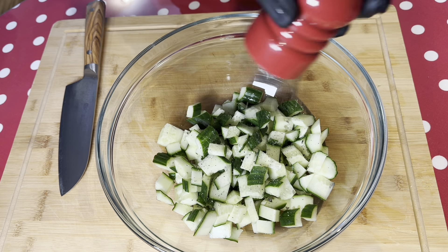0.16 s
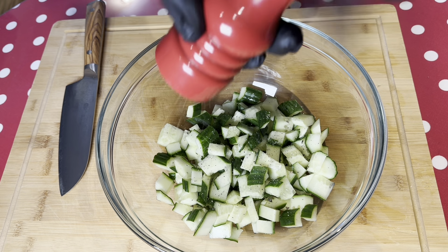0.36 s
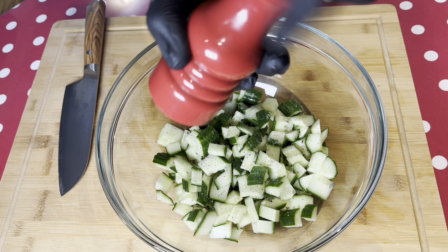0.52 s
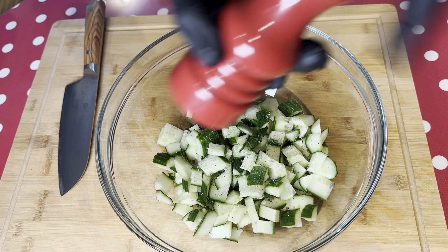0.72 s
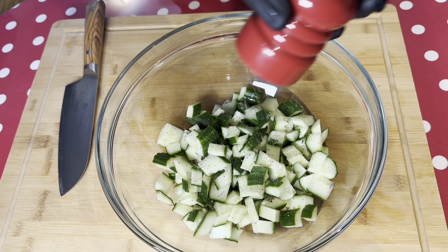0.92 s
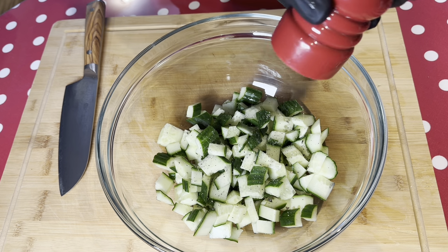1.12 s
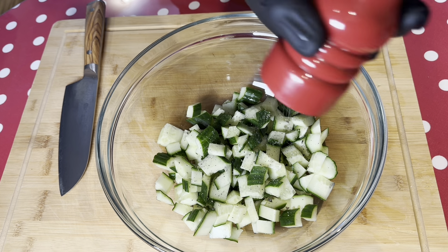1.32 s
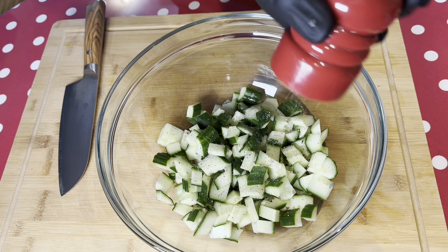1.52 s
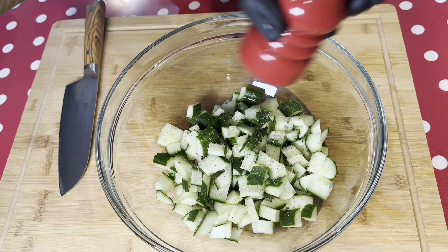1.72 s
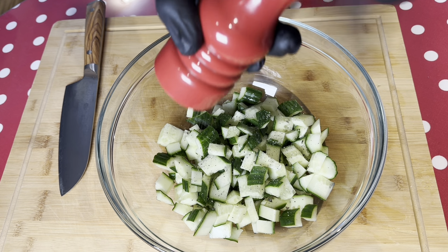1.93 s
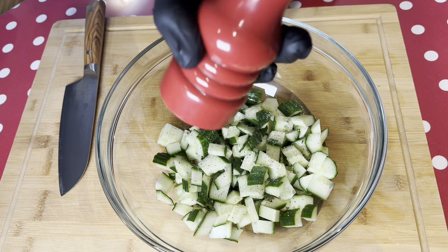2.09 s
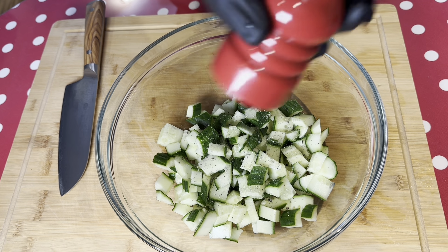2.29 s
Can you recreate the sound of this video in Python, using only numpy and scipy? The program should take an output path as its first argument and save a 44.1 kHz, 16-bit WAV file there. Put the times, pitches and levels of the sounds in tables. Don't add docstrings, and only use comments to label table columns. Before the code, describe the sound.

Close pepper grinding: quick, gritty twists with snapping corns and small ticks in a quiet kitchen.

```python
import sys
import numpy as np
from scipy import signal
from scipy.fft import rfft, irfft, next_fast_len
from scipy.io import wavfile
from scipy.ndimage import uniform_filter1d, map_coordinates

SR = 44100
rng = np.random.default_rng(int(sys.argv[2]) if len(sys.argv) > 2 else 0)


def undo_db(level):
    steps = np.asarray(level, float) / 20
    return 10 ** steps


def transcribe(signal):
    frames = np.atleast_2d(signal).T
    limited = np.clip(frames, -1, 1)
    pcm = np.round(limited * 32767).astype(np.int16)
    wavfile.write(sys.argv[1], SR, pcm)


N = 103635

# start t/s, swell t/s, hold t/s, level/dB
TWISTS = [
    (-.2, 0.094, 0.082, -35.5),
    (0.149, 0.053, 0.1, -45),
    (0.48, 0.056, 0.053, -40.5),
    (.787, 0.022, 0.084, -38.5),
    (1.098, 0.062, 0.041, -37.5),
    (1.399, 0.062, 0.053, -44),
    (1.681, 0.13, 0.023, -41.5),
    (2.023, 0.027, 0.07, -41.5),
    (2.276, 0.057, 0.039, -52),
]
# brightness level/dB, burr ring level/dB, body level/dB, left over right level/dB, trickle level/dB
TWIST_COLOURS = [
    (-6, 15.5, -13, 2.7, -50),
    (11.5, 8, 0.5, 1, -58),
    (5, 1, 0, 2.5, -55.5),
    (-5, -3, -0.5, 1.5, -58.5),
    (4, -1, -1.5, 0, -61.5),
    (4.5, 4, 3.5, -0.5, -54.5),
    (6, 0.5, 2, 1, -57.5),
    (8, 3.5, -3, 1.5, -58.5),
    (11, -11, 2.5, 0.5, -55),
]
# t/s, peak level/dB, thump level/dB, brightness level/dB, burr ring level/dB
CRACKS = [(0.163, -52, 1, 0.1, 3), (0.18, -36, -19, -12, 12), (0.249, -5.5, -22, -7, 3.8),
          (0.45, -37, -0.5, 11, -14), (0.504, -29, -2, 7, -26), (0.528, -11.5, -46, 1, 4),
          (0.576, -20, 1.5, -7, 6), (0.609, -32.5, -18, -4, 11.5), (0.774, -41, -6, 7, 3),
          (0.793, -24, -32, -14, -24), (0.888, -33, 2, 11.5, 6), (1.077, -33, -7.5, 9, 4.5),
          (1.115, -30.5, -10.5, 9.5, 2.5), (1.151, -21, -5, -15, -12), (1.28, -45, 8.5, -5, -5),
          (1.382, -28, -18.5, 0.1, -8), (1.416, -28.5, -9, 12.5, 5.5), (1.481, -30.5, 0.5, 4, 12),
          (1.513, -34, -25, 10, 15.5), (1.557, -39.5, 5.5, -14, -23), (1.688, -28, 2.5, 0, -14),
          (1.749, -44, -6, -12, -22), (2.015, -43, 11, 1, -11), (2.048, -12, -54, 8, 5)]
MORE_CRACKS = [
    (0.131, -39, -7, 12.5, -8),
    (1.612, -40, -17, 1, 3.5),
    (1.715, -29.5, -4, 0, -9),
    (1.891, -55, 4, -6, -6),
    (2.103, -32.5, 13.5, -11, -15),
    (2.277, -47.5, 3.5, 9, -4),
    (2.333, -23, -5, -11, -9),
]
# t/s, peak level/dB, pitch f/Hz, T60 t/s
CORN_NOTES = [(.162, -40, 4850, .015), (0.163, -42, 6100, .02), (.181, -38, 4190, 0.018),
              (2.046, -22, 1178, 0.022), (1.153, -26, 2670, 0.011), (0.248, -14, 3960, 0.035),
              (.249, -25, 1918, 0.046), (.258, -37.5, 200.3, 0.11), (0.525, -30, 5800, 0.013),
              (.575, -16, 1160, 0.019), (.579, -38.5, 295, 0.1), (.775, -42.5, 5000, 0.017),
              (1.151, -29, 1194, 0.029), (1.416, -34, 4970, 0.027), (1.558, -39.5, 1014, 0.022),
              (1.788, -38, 199.6, 0.12), (2.049, -20.5, 4210, 0.02), (2.105, -30, 1310, 0.011)]
# t/s, peak level/dB, pitch f/Hz, T60 t/s
TICKS = [(0.144, -38, 8200, 0.0086), (.2, -36, 4180, .02), (0.228, -33, 1500, .012),
         (.428, -47, 1100, .015), (.486, -46, 3800, 0.015), (.82, -27.5, 2170, 0.0078),
         (0.835, -39, 5300, 0.013), (0.854, -32, 2930, .015), (1.081, -44, 3150, 0.016),
         (1.154, -28.5, 4240, .012), (1.171, -26, 2480, 0.011), (1.207, -38, 1530, 0.01),
         (1.279, -55, 1155, .04), (1.375, -55, 6100, 0.0093), (1.559, -40.5, 1830, 0.013),
         (1.581, -49, 7700, 0.012), (1.69, -39, 1220, 0.0066), (1.697, -32, 3660, 0.011),
         (1.714, -43, 5200, .012), (1.731, -35, 2280, .01), (1.746, -36.5, 2750, 0.02),
         (1.808, -36, 4750, 0.014), (1.811, -33, 1590, 0.016), (1.832, -31, 2240, .01),
         (2.04, -31, 1520, 0.012), (2.048, -34, 5270, 0.013), (2.079, -25.5, 1030, 0.015),
         (2.113, -40, 605, 0.013), (2.301, -52, 3960, 0.013), (2.323, -30, 1160, 0.016),
         (2.342, -35, 480, .03)]
# t/s, peak level/dB, pitch f/Hz, T60 t/s
JOLTS = [
    (0.249, -45.5, 110, 0.17),
    (0.763, -56, 112, 0.12),
    (1.091, -63, 105, .15),
    (1.42, -68, 75, 0.13),
    (1.719, -51.5, 83, 0.21),
    (2.285, -59, 76, 0.28),
]
# start t/s, length t/s, pitch f/Hz, level/dB
RUBS = [(0.165, 0.13, 6100, -54), (0.177, 0.052, 4140, -53.5), (0.254, 0.047, 1790, -46),
        (0.818, 0.054, 5300, -54), (1.11, 0.11, 4115, -50), (1.457, 0.032, 4200, -47),
        (1.757, 0.082, 6140, -58), (1.758, 0.011, 2320, -49.5), (1.792, .04, 4220, -50),
        (2.055, 0.058, 4160, -55), (2.319, .06, 4170, -50)]
# f/Hz, width f/Hz, level/dB
BODY_MODES = [(212, 60.6, 8), (484, 156, -7), (1190, 16, 5), (1990, 153, -4), (2234, 36, -12),
              (2830, 280, -2.5)]
# f/Hz, width f/Hz, level/dB
BURR_MODES = [(4070, 71, 7), (4218, 142, 4), (4703, 286, 0), (5380, 150, -2), (6240, 260, -2),
              (8640, 650, -4.5)]
# f/Hz, level/dB
CRUNCH_SPECTRUM = [(60, -34), (200, -8), (500, -3), (2400, -3.5), (3350, -7.5), (5000, -7), (7300, -9.5),
                   (15000, -9)]
# f/Hz, level/dB
TRICKLE_SPECTRUM = [(150, -3), (600, -4), (3000, -0.5), (8000, -5.5), (14000, -1.5)]
# t/s, level/dB
GRIP = [(0, -81), (.29, -71), (.45, -81), (.58, -66), (.85, -102), (1.4, -81), (1.55, -78), (1.75, -72.5),
        (2.3, -79.5)]
# f/Hz, T60 t/s
KITCHEN_T60 = [(200, 0.3), (1000, 0.29), (4000, 0.35), (10000, 0.2)]
# f/Hz, level/dB
KITCHEN_SPECTRUM = [(200, -11), (600, -13), (1200, -9), (4000, -11), (7000, -4.5), (8500, -18)]
# f/Hz, level/dB
AIR_SPECTRUM = [(30, -38), (110, -17), (220, -13.5), (1000, -17), (4000, -17), (8500, -12.5),
                (14500, -11.5)]
# f/Hz, left over right level/dB
PORT_LEAN = [(100, 0.2), (500, -0.4), (2000, 0.5), (5000, 2.5), (7000, 1)]
# f/Hz, left lead/rad
PORT_TURN = [(300, 0.34), (700, 0.88), (1500, 0.66), (2500, 1), (4500, 0.77), (6900, -1.35)]

BITE_DB, RELEASE_DB_PER_S = -14.5, 509
TRICKLE_CLUMP_DB, TRICKLE_DB_PER_S, STILL_S = 7.5, 11, 0.029
GRIT_PER_S, GRIT_SAMPLES, GRIT_CYCLES = 3000, 160, 2.2
GRIT_HZ, GRIT_OCTAVES, GRIT_SPREAD_DB, GRIT_MOST = 4130, 1.492, 4, 1.7
CLUMP_DB, DUST_DB = 1.18, -4
CRACK_RISE_S, CRACK_T60_S, SOFTER_WHEN_SMALL = 0.0013, 0.083, 0.7
SNAP_DB, SNAP_S, AFTER_DB, AFTER_T60_S = 4.5, 0.0031, -10, 0.15
THUMP_LATE_S, THUMP_T60_S = 0.001534, 0.27
NOTE_RISE_CYCLES = 1.62
RUB_WIDTH_HZ, RUB_FLUTTER_DB, RUB_EDGE_S = 210, 4.5, 0.0036
ROOM_SHARED, AIR_DB = 0.1, -57.5
PORTS_IN_STEP_HZ, PORT_COMB_HZ, TOP_HZ, NOTCH_WIDER_RAD = 7900, 3150, 15330, 0.54


def unit(x):
    return x / np.sqrt(np.mean(x ** 2) + 1e-20)


def along(points, hz):
    f, v = np.transpose(points)
    return np.interp(np.log(hz + 1), np.log(f + 1), v)


def wobble(rate_hz):
    knots = rng.standard_normal(int(N * rate_hz / SR) + 4)
    return map_coordinates(knots, [np.arange(N) * rate_hz / SR])


def filtered(x, response):
    m = next_fast_len(N + SR // 2)
    return irfft(rfft(x, m) * response(np.fft.rfftfreq(m, 1 / SR)), m)[..., :N]


def resonances(modes):
    return lambda f: sum(undo_db(db) * 1j * f * w / (c * c - f * f + 1j * f * w) for c, w, db in modes)


def brighter(x):
    return filtered(x, lambda f: (1j * f / 5000 / (1 + 1j * f / 5000)) ** 2)


def mill():
    grains, on_burr, on_body, trickle, lean_db = grind()
    burst, push, treble, ring = cracks()
    thump = filtered(push, lambda f: 2.4 * np.exp(-2j * np.pi * f * THUMP_LATE_S) / (1 + 1j * f / 1300) ** 2)
    burst = filtered(burst, lambda f: 0.83 * (1j * f / 800 / (1 + 1j * f / 800)) ** 3)
    hollow = filtered(on_body, lambda f: 0.5 / (1 + 1j * f / 500) ** 2)
    direct = grains + hollow + burst + brighter(treble) + thump
    body = filtered(on_body + 1.42 * burst + thump, resonances(BODY_MODES))
    burr = filtered(on_burr + ring, resonances(BURR_MODES))
    crunch = filtered(direct + body + burr, lambda f: undo_db(along(CRUNCH_SPECTRUM, f) + 3.5))
    return crunch + trickle + notes() + rubs(), lean_db


def grind():
    t = np.arange(N) / SR
    power, fall, colour = np.zeros(N), np.zeros(N), np.zeros((4, N))
    next_starts = [twist[0] for twist in TWISTS[1:]] + [9]
    for (s, swell, hold, db), (*tone, trickle_db), next_s in zip(TWISTS, TWIST_COLOURS, next_starts):
        past = np.maximum(t - s - swell - hold, 0)
        bite_db = BITE_DB * np.clip(1 - (t - s) / swell, 0, 1)
        power += (t > s) * undo_db(db + bite_db - RELEASE_DB_PER_S * past) ** 2
        until_rest = np.clip((next_s - STILL_S - t) / 0.11, 0, 1)
        fall += (t > s) * undo_db(trickle_db - TRICKLE_DB_PER_S * past) * until_rest
        colour[:, t > s - STILL_S] = np.array(tone)[:, None]
    bright_db, burr_db, body_db, lean_db = colour
    clumps = undo_db(CLUMP_DB * (wobble(59.94) + wobble(150)))
    x = unit((grit() + undo_db(DUST_DB) * rng.standard_normal(N)) * clumps) * np.sqrt(power)
    trickle = unit(filtered(rng.standard_normal(N), lambda f: undo_db(along(TRICKLE_SPECTRUM, f))))
    trickle = trickle * undo_db(TRICKLE_CLUMP_DB * wobble(40.28)) * fall
    grains = x + (undo_db(bright_db) - 1) * brighter(x)
    return grains, x * undo_db(burr_db), x * undo_db(body_db), trickle, uniform_filter1d(lean_db, size=900)


def grit():
    count = round(GRIT_PER_S * N / SR)
    at, size, pitch = rng.random(count), rng.exponential(size=count), rng.standard_normal(count)
    hz = np.clip(GRIT_HZ * 2 ** (GRIT_OCTAVES * pitch), 300, 15000)[:, None]
    turns = hz * np.arange(GRIT_SAMPLES) / SR
    level = undo_db(GRIT_SPREAD_DB * np.minimum(size, GRIT_MOST))[:, None] * np.sqrt(hz)
    grains = level * np.sin(2 * np.pi * turns) * np.exp(-turns / GRIT_CYCLES * 2)
    where = (at * N).astype(int)[:, None] + np.arange(GRIT_SAMPLES)
    return unit(np.bincount(where.ravel(), grains.ravel(), N)[:N])


def cracks():
    out, t = np.zeros((4, N + SR)), np.arange(SR // 4) / SR
    for s, db, thump_db, bright_db, ring_db in CRACKS + MORE_CRACKS:
        rise = CRACK_RISE_S * undo_db(np.clip(SOFTER_WHEN_SMALL * (-22 - db), 0, 12))
        snap = undo_db(SNAP_DB) * np.exp(-(t / (SNAP_S + rise)) ** 4)
        crumble = undo_db(-60 * t / CRACK_T60_S) + undo_db(AFTER_DB - 60 * t / AFTER_T60_S)
        shape = (1 - np.exp(-(t / rise) ** 2)) * (snap + crumble)
        burst = undo_db(db - 15.5) * shape * rng.standard_normal(len(t))
        push = burst * undo_db(thump_db - 60 * t / THUMP_T60_S)
        parts = np.array([burst, push, burst * (undo_db(bright_db) - 1), burst * undo_db(ring_db)])
        out[:, round((s - rise) * SR):][:, :len(t)] += parts
    return out[:, :N]


def notes():
    out, t = np.zeros(N + SR), np.arange(SR // 4) / SR
    for s, db, hz, t60 in CORN_NOTES + TICKS + JOLTS:
        pair = np.sin(2 * np.pi * hz * t) + 0.31 * np.sin(2 * np.pi * (1.09 * hz * t + rng.random()))
        rise = 1 - np.exp(-t * hz / NOTE_RISE_CYCLES)
        out[round(s * SR):][:len(t)] += undo_db(db - 60 * t / t60) * rise * pair
    return out[:N]


def rubs():
    t, out = np.arange(N) / SR, np.zeros(N)
    for s, length, hz, db in RUBS:
        band = filtered(rng.standard_normal(N), lambda f: resonances([(hz, RUB_WIDTH_HZ, 0)])(f) ** 2)
        gate = np.clip(np.minimum(t - s, (s + length - t) / 2) / RUB_EDGE_S, 0, 1)
        out += undo_db(db + RUB_FLUTTER_DB * wobble(90)) * gate * unit(band)
    return out


def handling():
    s, db = np.transpose(GRIP)
    band = lambda f: (f / 52) ** 5 / (1 + (f / 52) ** 5) / (1 + (f / 110) ** 3)
    rumble = unit(filtered(rng.standard_normal(N), band))
    return rumble * undo_db(np.interp(np.arange(N) / SR, s, db) + 4.0 * wobble(9.53))


def kitchen(x):
    out = np.zeros((2, N + SR))
    edges = [0] + [round(twist[0] * SR) for twist in TWISTS[2:]] + [N]
    for a, b in zip(edges, edges[1:]):
        hz, t, z = signal.stft(rng.standard_normal((2, SR // 2)), SR, nperseg=256)
        decay = undo_db(-60 * t / along(KITCHEN_T60, hz)[:, None])
        tail = signal.istft(z * decay, SR, nperseg=256)[1]
        wet = signal.fftconvolve(x[None, a:b], tail / np.linalg.norm(tail[0]), axes=1)
        out[:, a + 200:][:, :wet.shape[1]] += wet
    shared = ROOM_SHARED * out[::-1] + out
    return filtered(shared[:, :N], lambda f: undo_db(along(KITCHEN_SPECTRUM, f) - 2.5))


def air():
    mid, side = rng.standard_normal((2, N)) * undo_db(0.44 * wobble(4.5))
    side = filtered(side, lambda f: 0.5 / (1 + (f / 6000) ** 8))
    ports = np.array([mid + side, mid - side])
    return undo_db(AIR_DB) * unit(filtered(ports, lambda f: undo_db(along(AIR_SPECTRUM, f))))


def scene():
    dry, lean_db = mill()
    wet = dry + kitchen(dry)
    lows = filtered(wet, lambda f: 1 / (1 + (f / 6500) ** 8))
    lean = lows * (undo_db([lean_db / 2, -lean_db / 2]) - 1)
    return wet + lean + air() + handling()


def low_pass(x):
    return signal.sosfilt(signal.butter(12, 16490, fs=SR, output="sos"), x)


def record(dry):
    def turn(f):
        lag = -2 * np.pi * (f - PORTS_IN_STEP_HZ) / PORT_COMB_HZ
        return np.where(f > PORTS_IN_STEP_HZ, lag, along(PORT_TURN + [(PORTS_IN_STEP_HZ, 0)], f))

    def half(f):
        widened = NOTCH_WIDER_RAD * np.sin(2 * turn(f)) * (f > PORTS_IN_STEP_HZ)
        gain = undo_db(along(PORT_LEAN + [(PORTS_IN_STEP_HZ, 0)], f) / 2)
        return gain * np.exp(0.5j * (turn(f) - widened))

    def edge(f):
        return undo_db(-38 * np.clip((f - TOP_HZ) / 150, 0, 1))

    ports = filtered(dry, lambda f: np.array([half(f), 1 / half(f)]) * edge(f))
    return low_pass(ports)


dry = scene()
out = record(dry)
transcribe(out)
```